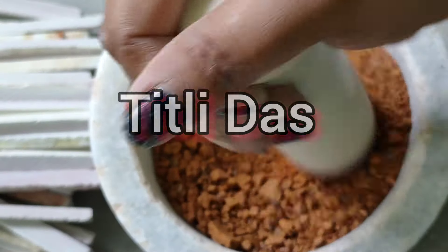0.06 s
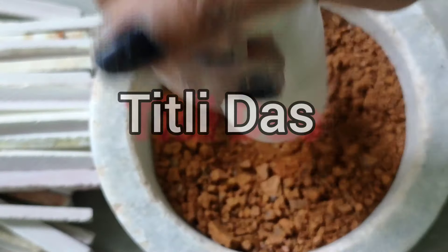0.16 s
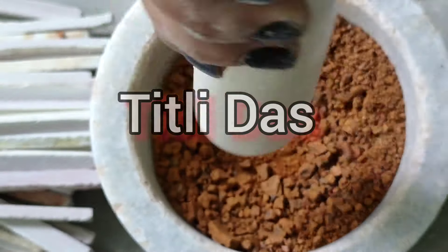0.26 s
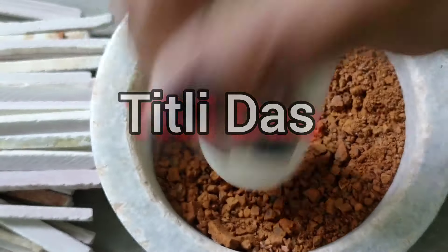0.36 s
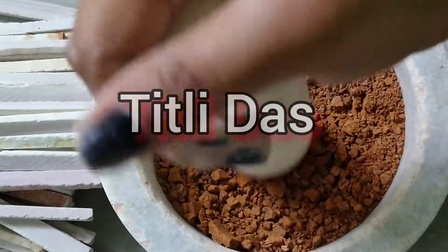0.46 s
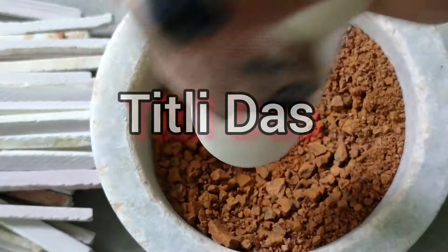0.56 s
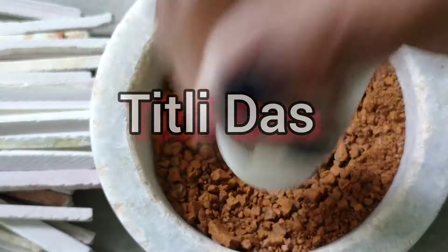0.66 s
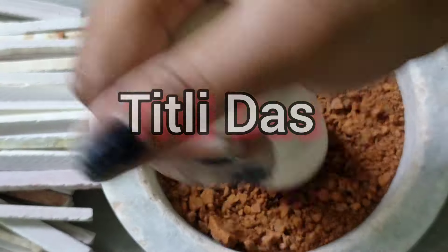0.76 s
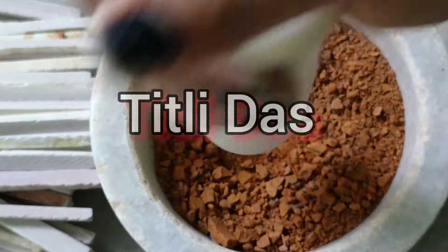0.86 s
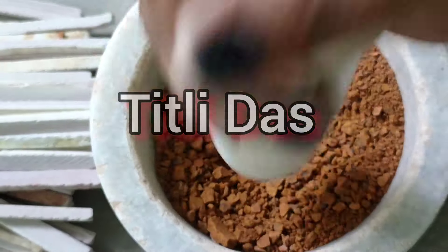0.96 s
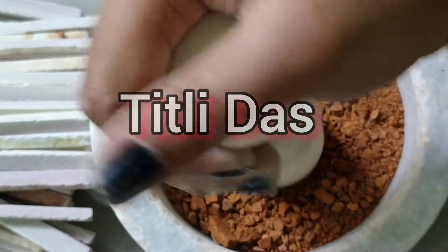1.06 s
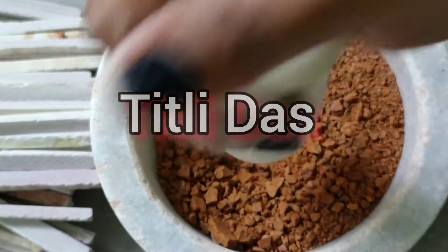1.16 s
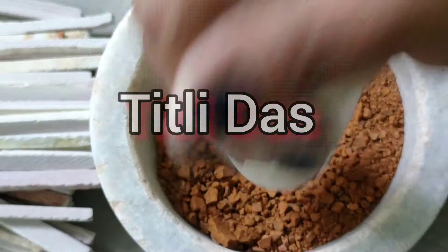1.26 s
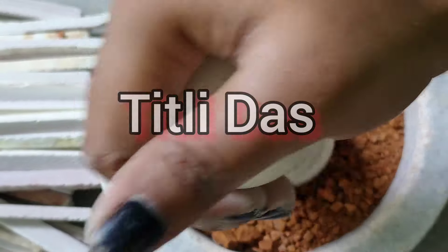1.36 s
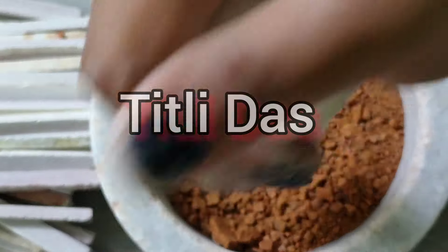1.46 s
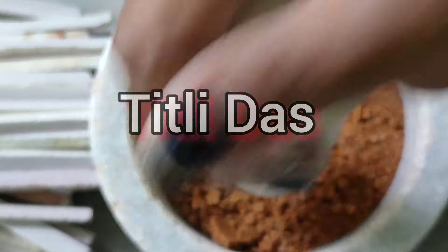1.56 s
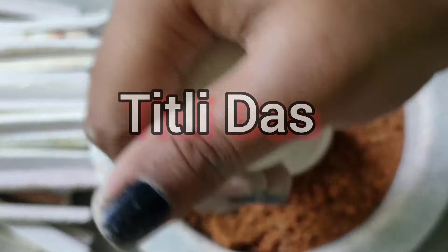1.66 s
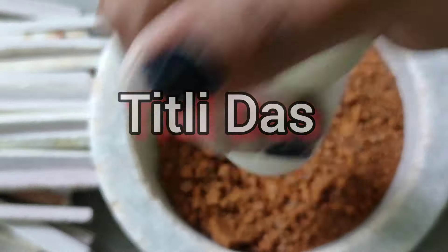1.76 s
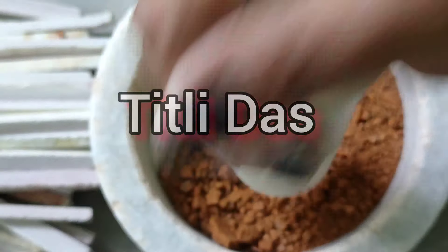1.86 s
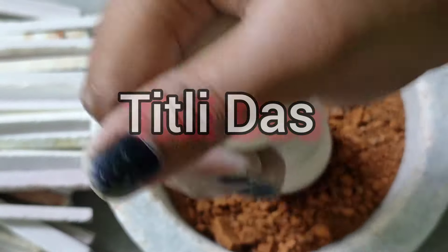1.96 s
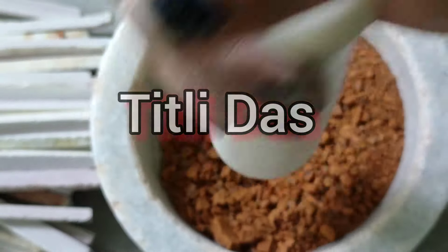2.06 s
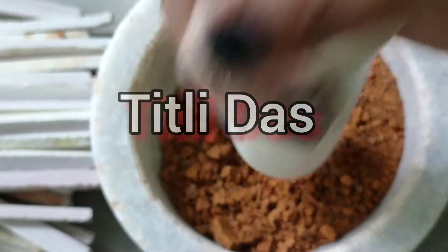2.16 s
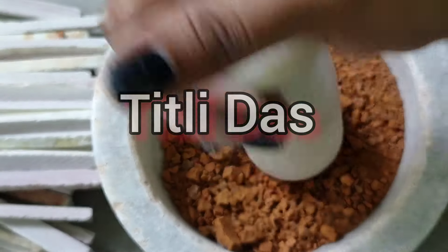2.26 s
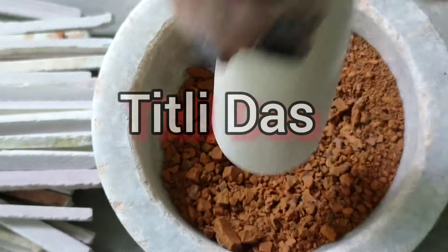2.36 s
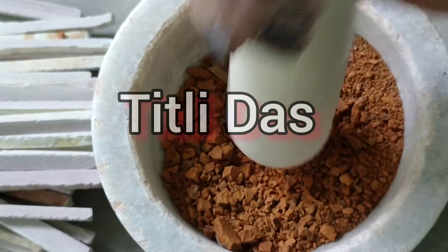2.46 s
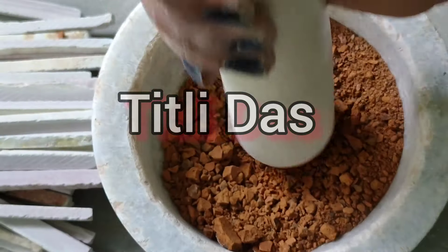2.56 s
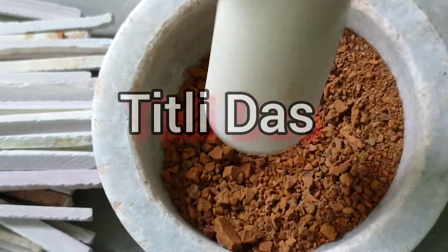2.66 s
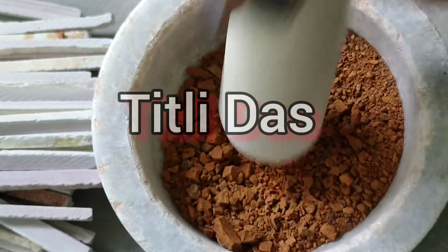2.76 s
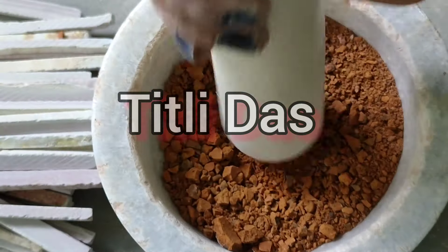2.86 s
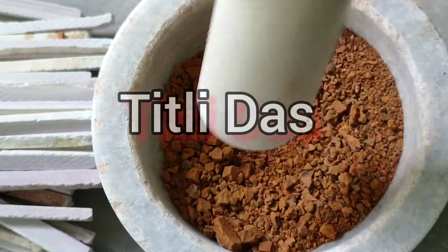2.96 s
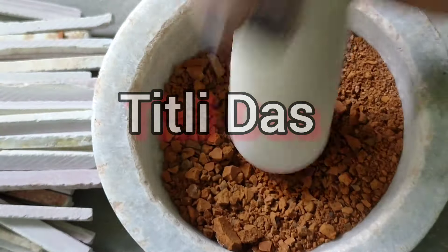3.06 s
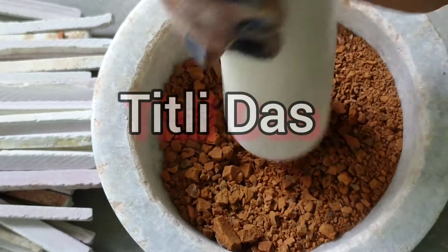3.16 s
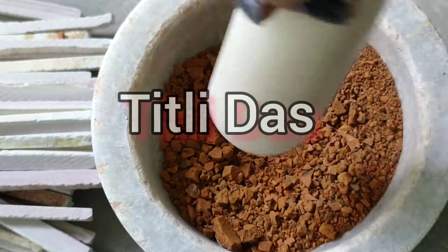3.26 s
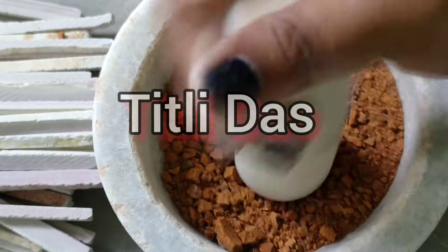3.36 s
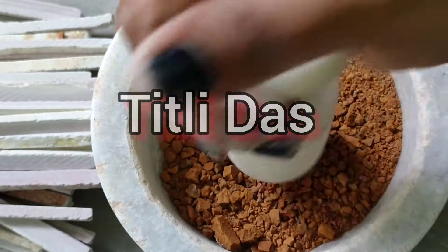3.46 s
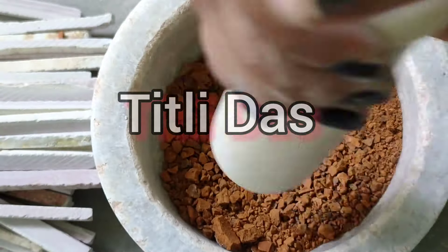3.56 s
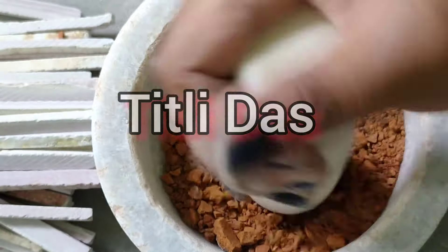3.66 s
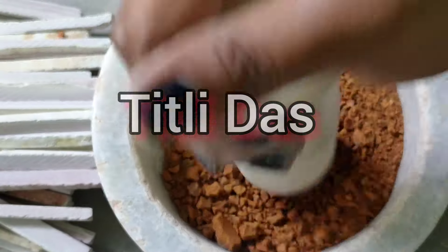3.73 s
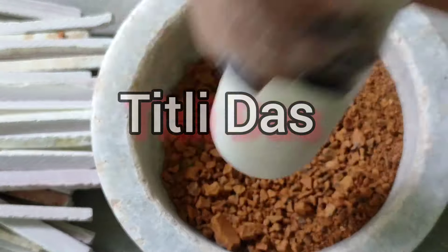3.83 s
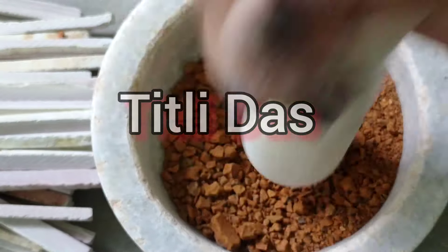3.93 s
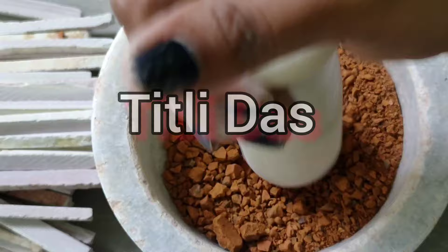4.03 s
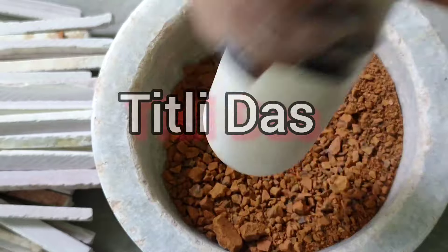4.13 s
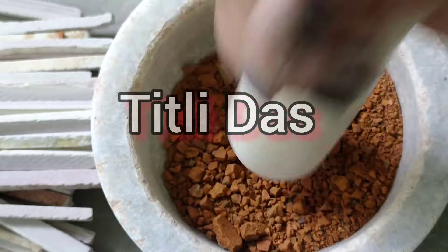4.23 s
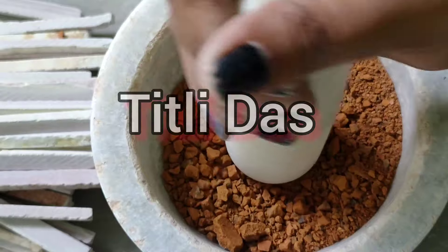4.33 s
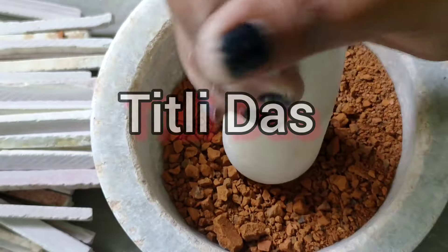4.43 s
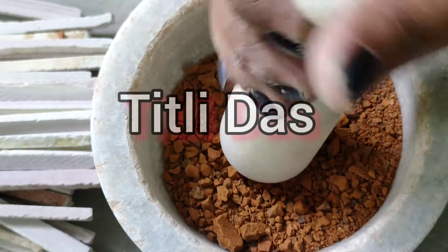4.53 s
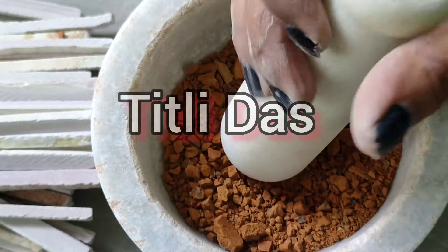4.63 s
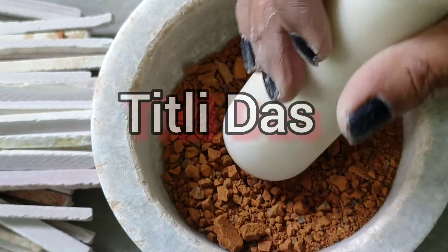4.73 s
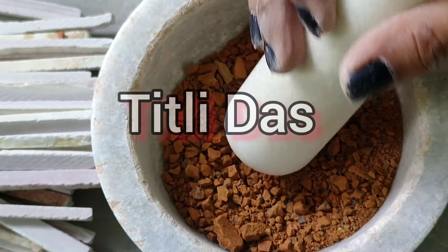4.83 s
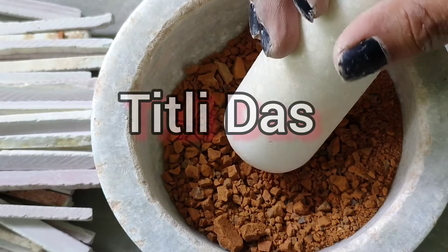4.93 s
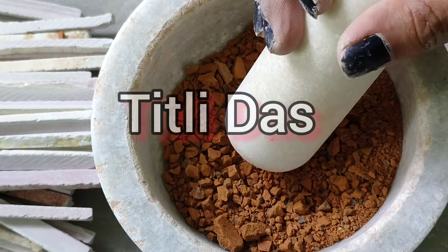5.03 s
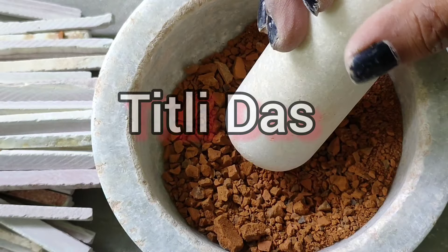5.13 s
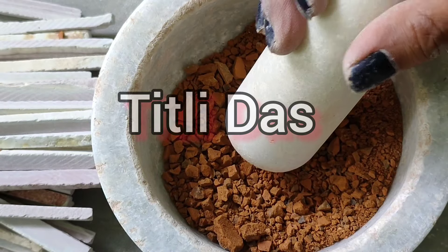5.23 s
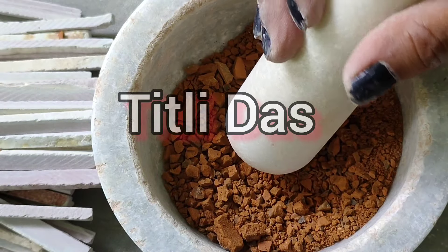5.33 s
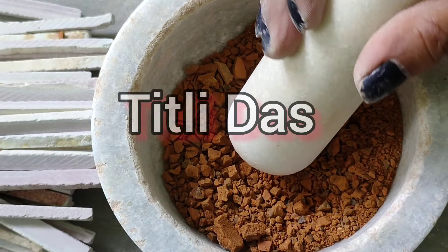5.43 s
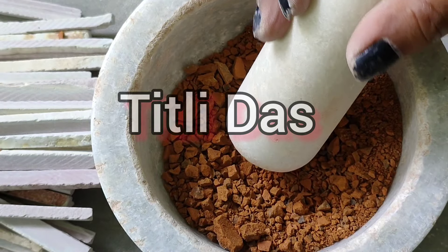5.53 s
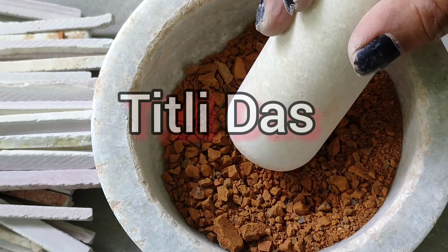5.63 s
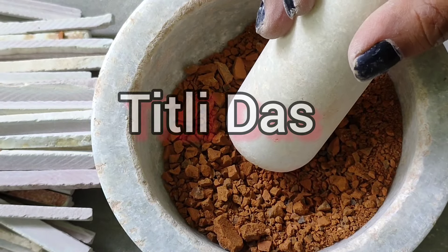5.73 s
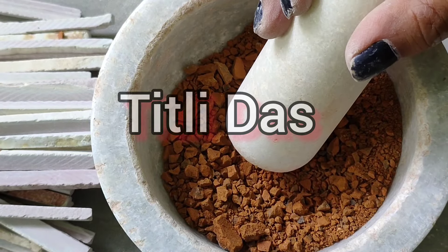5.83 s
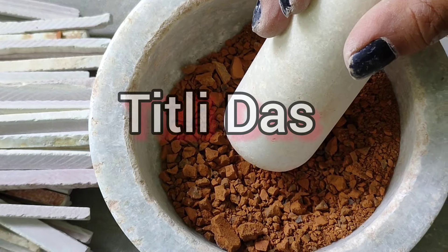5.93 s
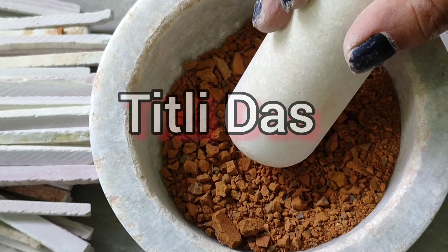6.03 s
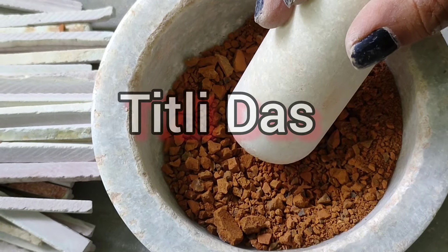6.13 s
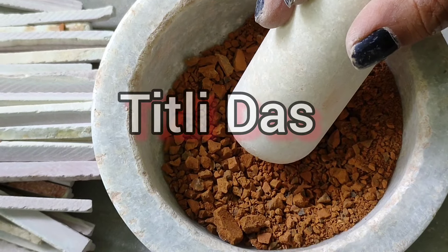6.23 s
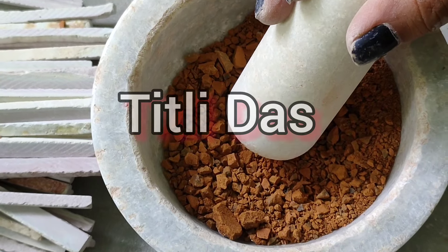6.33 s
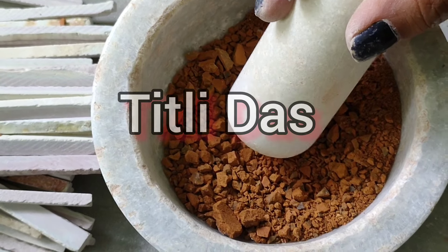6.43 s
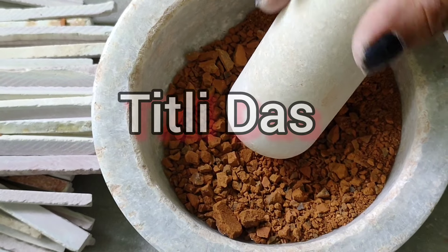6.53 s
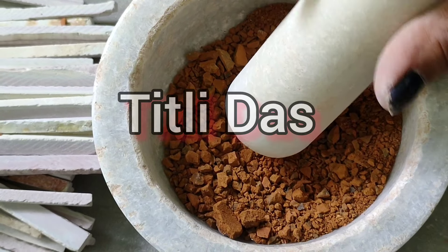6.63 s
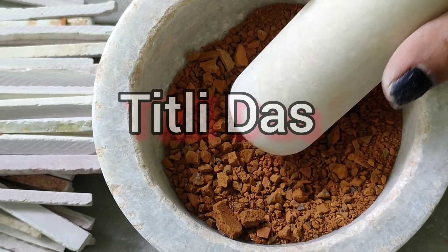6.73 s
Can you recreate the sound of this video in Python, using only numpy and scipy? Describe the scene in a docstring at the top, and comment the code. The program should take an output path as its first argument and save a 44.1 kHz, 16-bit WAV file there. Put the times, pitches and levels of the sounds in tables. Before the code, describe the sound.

Rapid, regular mortar-and-pestle pounding: short woody-sounding stone knocks, doubled by quick rebounds, with crisp snaps of chalk and sprayed grit. The first blows are weaker, later ones fuller. The echoes of a hard, empty room linger briefly. Then near quiet: a few hollow taps, a soft finger slide, tiny crumb ticks and short grainy scrapes near the end, over low handling rumble and still air. Close stereo microphone, held in hand.

```python
"""A stone pestle pounds chalk lumps in a marble mortar: fourteen strokes at an even pace, then rest.
Damped modes make the knocks, shaped noise bursts the cracks, tiny grains the grit, slips and taps the rest.
A bare, hard room rings on as banded noise tails and standing waves.
Fingers hiss on the pestle, with one tiny high tick near the end; the hand that holds the close microphone
rumbles and bumps, and still air lies below.
"""
import sys
import numpy as np
from scipy import signal
from scipy.fft import rfft, irfft
from scipy.io import wavfile
from scipy.ndimage import uniform_filter1d

SR = 44100
rng = np.random.default_rng(int(sys.argv[2]) if len(sys.argv) > 2 else 0)


def materialize(psi):
    """Save the field psi as 16-bit PCM at rate SR to the path in sys.argv[1].

    A 1-D psi becomes a single channel; in a 2-D psi each row is a channel.
    """
    bounded = np.clip(np.atleast_2d(psi).T, -1, 1)
    quanta = np.round(bounded * 32767).astype(np.int16)
    wavfile.write(sys.argv[1], SR, quanta)


N = 299439
TIME = np.arange(N) / SR
TOP_HZ = 15900


# the pestle lands on the chalk; knock levels before the bowl's filters, crack and grit before their colour:
# (t/s, clack level/dB, thud level/dB, clack f/Hz, crack level/dB, crumbling relative to the snap level/dB,
#  bright ring level/dB, grit level/dB, send to the room level/dB)
STROKES = [(0.3346, -14, -24, 1330, -46, -20, -42, -71, -1.5),
           (0.65, -4, -12, 1150, -34, -15.5, -37, -50, -2), (0.9555, -6, -6, 1330, -40, -26, -37, -30, 0.5),
           (1.2484, -11.5, -2.5, 1320, -45.5, -18.5, -43, -32, -1),
           (1.5448, -16.5, -4, 1290, -43, -17.5, -43.5, -40, -0.5),
           (1.8423, -2.5, -4, 1136, -45, -6.5, -56.5, -38.5, 0.5),
           (2.1395, -6, -3.5, 1184, -44.5, -12, -60, -40, -2),
           (2.4319, -5.5, -15.5, 1080, -37.5, -18.5, -46, -51.5, -3),
           (2.7283, -1, -6.5, 1290, -42, -15, -47.5, -38, -1.5),
           (3.0184, 1.5, -7, 1360, -44.5, -18.5, -41, -36, 1),
           (3.3045, -0.5, -5.5, 1350, -48, -11, -73.5, -54, -2),
           (3.5923, -11, -7.5, 1250, -37.5, -8.5, -48, -35, -2),
           (3.8974, -4, -10, 1220, -44.5, -19.5, -41, -45, -2.5),
           (4.1955, -0.5, -7, 1365, -40.5, -18, -45, -35.5, 2)]
# the pestle bounces or a lump gives way, and it drops onto the stone again; levels as for the strokes:
# (t/s, clack level/dB, thud level/dB, clack f/Hz, crack level/dB, grit level/dB)
DROPS = [(0.3375, -16.5, -27.5, 1460, -49, -55.5), (0.3402, -27, -31, 1750, -55.5, -60.5),
         (0.3673, -27, -30.5, 1450, -65, -67), (0.6525, -6, -19, 1100, -54, -53.5),
         (0.656, -20.5, -25, 1140, -61, -54), (0.684, -10.5, -13, 1160, -61, -52),
         (0.7051, -7.5, -14.5, 1220, -54, -47.5), (0.957, -15.5, -25, 1360, -66, -38),
         (0.9637, -14.5, -22, 1300, -59.5, -53), (0.9727, -23.5, -15.5, 1260, -57, -49.5),
         (0.9825, -7.5, -16, 1270, -57.5, -47), (0.9971, -14, -24.5, 1290, -62.5, -49),
         (1.2513, -1.5, -10, 1280, -45, -47), (1.2547, -3, -23, 1160, -55.5, -52.5),
         (1.267, -17.5, -20, 1250, -64, -52.5), (1.2792, -8, -15, 1210, -62.5, -51.5),
         (1.295, -13.5, -19.5, 1300, -66.5, -46.5), (1.549, -6, -18.5, 1163, -54.5, -39.5),
         (1.552, -15, -14, 1240, -67, -44.5), (1.563, -11, -11.5, 1310, -55.5, -46.5),
         (1.8449, -20, -19, 1250, -58.5, -47), (1.8639, -6, -20.5, 1270, -62, -46.5),
         (1.8749, -4.5, -21.5, 1160, -73.5, -46), (2.142, -9.5, -17.5, 1310, -55.5, -44),
         (2.1554, -19, -27.5, 1280, -65, -48.5), (2.169, -3, -19, 1250, -60, -37),
         (2.178, -11, -15.5, 1272, -62, -40), (2.4389, 0, -11.5, 1296, -45.5, -46.5),
         (2.4425, -6, -15, 1370, -56, -40.5), (2.4859, -16.5, -30.5, 1330, -66.5, -57.5),
         (2.7332, -9, -18.5, 1300, -61.5, -49.5), (2.7359, 1.5, -15, 1334, -60.5, -48),
         (3.0264, -8, -19.5, 1330, -60.5, -39), (3.0291, -4.5, -25, 1340, -57, -44),
         (3.3262, -14.5, -21, 1320, -63, -62.5), (3.3373, -7, -9.5, 1280, -65.5, -62),
         (3.3522, -9, -13, 1240, -61, -58.5), (3.5946, -1.5, -22, 1220, -56, -40.5),
         (3.6249, -19.5, -26.5, 1250, -65, -44), (3.6348, -2.5, -12.5, 1215, -54, -38.5),
         (3.666, -4, -14.5, 1270, -60, -30), (3.671, -13, -20, 1244, -62, -47),
         (3.899, -16, -32.5, 1260, -57.5, -51.5), (3.934, -2, -14, 1284, -45.5, -29),
         (3.942, -12, -34, 1330, -60.5, -35.5), (4.2035, -5.5, -19.5, 1305, -65.5, -53),
         (4.213, -11.5, -16.5, 1300, -61, -42.5)]


def contacts(count=3, from_s=0.0087, to_s=0.045, rattle_db=-19, rattle_db_per_s=-1.5):
    """Every meeting of pestle and bowl: landings, drops, and a light rattle through ever finer crumbs."""
    meetings = [row[:4] for row in DROPS]
    for s, clack_db, thud_db, hz, *_ in STROKES:
        meetings.append((s, clack_db, thud_db, hz))
        fall_db = rattle_db + rattle_db_per_s * s
        # one rattle at a random moment in each equal part of the window
        places = (np.arange(count) + rng.random(count)) / count
        for delay in from_s + (to_s - from_s) * places:
            meetings.append((s + delay, clack_db + fall_db, thud_db + fall_db, hz))
    return meetings


# modes of the damped bowl that follow the point of contact, levels relative and before the tilt:
# (f as a ratio to the clack pitch, swell/ms, level/dB)
CLACK_MODES = [(.8, 0.72, 2), (0.997, 0.66, 20), (1.25, 0.6, -4), (1.83, 0.6, -4.5), (2.148, 0.52, -10.5)]
# the deeper body of the mortar, levels relative: (f/Hz, swell/ms, level/dB)
THUD_MODES = [(217.9, 2, -4.5), (338.8, 1.54, 1.5), (517, 1.067, 9.5), (667, 0.74, -25)]


def knocks(thud_lead_s=0.00053, even_db=12.5, gap_hz=850, gap_width_hz=260, gap_depth=0.41,
           lowest_hz=130, cushion_hz=3600):
    """Every contact rings the bowl for a few milliseconds; chalk and hand damp it at once."""
    track, t = np.zeros(N), np.arange(SR // 30) / SR
    thud = sum(undb(db) * ring(t, hz, ms) for hz, ms, db in THUD_MODES)
    thud /= np.abs(thud).max()
    for s, clack_db, thud_db, pitch in contacts():
        # little chalk in between, a short contact: more clack than thud, and stronger upper modes
        tilt_db = np.clip(clack_db - thud_db - even_db, -10, 10)  # per octave
        clack = sum(undb(db + tilt_db * np.log2(ratio)) * ring(t, ratio * pitch, ms)
                    for ratio, ms, db in CLACK_MODES)
        add(track, s, undb(clack_db) * clack / np.abs(clack).max())
        # the bowl is already pushed while the last chalk gives way
        add(track, s - thud_lead_s, undb(thud_db) * thud)
    # between its thud and its clack the bowl answers less
    track = track - gap_depth * resonant(track, gap_hz, gap_width_hz)
    # powder cushions the contact, and a small bowl radiates little bass
    band = signal.butter(2, [lowest_hz, cushion_hz], "band", fs=SR, output="sos")
    return signal.sosfiltfilt(band, track)


# colour of breaking chalk, relative: (f/Hz, level/dB)
CRACK_COLOUR = [(500, 2.5), (1500, 21), (2600, 3), (3400, -3), (4100, -1.5), (4700, 0), (5400, 2.5),
                (6300, 2.5), (7000, 0), (8200, 2.5), (8900, -8.5), (12500, -8.5), (14500, -4.5),
                (16000, -11)]
# the chalk snaps just before the stone is struck
SNAP_LEAD_S, SNAP_SWELL_S = 0.001, 0.00046
# after a drop: crumbling relative to the snap, and a fainter ring relative to the crack
DROP_CRUMBLE_DB, DROP_RING_DB = -20, -10
# the bright ring of the stone, its random scatter, and a broad mode just under it
RING_HZ, RING_SCATTER_HZ, RING_SWELL_MS = 8040, 60, 0.93
SKIRT_RATIO, SKIRT_SWELL_MS, SKIRT_DB = .945, .35, -2


def crunches(crumble_s=0.0031, fade_in_s=0.0018, spread_db=4.0, uneven_db=2.5):
    """A noise burst with a short fade-in before its snap, a crumbling tail, and a bright ring of the stone."""
    cracks, bright = np.zeros(N), np.zeros(N)
    t = np.arange(-SR // 150, SR // 12) / SR
    u = np.maximum(t, 0) / SNAP_SWELL_S
    snap = u * np.exp(1 - u)
    fade_and_tail = np.exp(np.minimum(t / fade_in_s, -t / crumble_s))
    bands = np.linspace(2500, TOP_HZ, 44)
    breaks = [(s, crack_db, crumble_db, ring_db)
              for s, _, _, _, crack_db, crumble_db, ring_db, _, _ in STROKES]
    breaks += [(s, crack_db, DROP_CRUMBLE_DB, crack_db + DROP_RING_DB) for s, *_, crack_db, _ in DROPS]
    for s, crack_db, crumble_db, ring_db in breaks:
        boost_db = spread_db * np.minimum(rng.exponential(size=len(t)), 4)
        sizes = rng.standard_normal(len(t)) * undb(boost_db)
        burst = sizes * (snap + undb(crumble_db) * fade_and_tail)
        # random uneven bands filter the treble of each burst; below the first band it stays even
        bands_db = uneven_db * rng.standard_normal(len(bands)) * (bands > bands[0])
        burst = unit(coloured(burst, np.transpose([bands, bands_db])))
        add(cracks, s - SNAP_LEAD_S + t[0], burst * undb(crack_db))
        # the pitch varies with the point of contact
        hz = RING_HZ + RING_SCATTER_HZ * rng.standard_normal()
        modes = ring(t, hz, RING_SWELL_MS) + undb(SKIRT_DB) * ring(t, SKIRT_RATIO * hz, SKIRT_SWELL_MS)
        add(bright, s + t[0], unit(modes) * undb(ring_db))
    return coloured(cracks, CRACK_COLOUR), bright


# colour of the snapping crumbs, relative: (f/Hz, level/dB)
GRIT_COLOUR = [(60, -35), (500, -10.5), (1000, 5.5), (1800, -3.5), (2300, -0.5), (2850, -14.5),
               (3400, -22.5), (4000, -25), (4700, -27.5), (6000, -26), (10000, -34.5), (15000, -34)]


def grit(settle_s=0.032, burst_s=0.004, grain_ms=0.26, spread_db=5.0, low_hz=700, high_hz=4200, count=28):
    """Crumbs snap, each with its own size and pitch: a spray as the pestle sinks in, a burst at every drop."""
    track, t = np.zeros(N), TIME[:SR // 100]
    sprays = [(s, grit_db, settle_s) for s, *_, grit_db, _ in STROKES]
    sprays += [(s, grit_db, burst_s) for s, *_, grit_db in DROPS]
    for s, grit_db, length_s in sprays:
        spray = np.zeros(SR // 4)
        for wait, size, pitch in rng.random((count, 3)):
            age = 2 * wait ** 2  # crowded towards the landing
            grain = ring(t, low_hz + (high_hz - low_hz) * pitch, grain_ms)
            grain[0] += 1  # a one-sample tick
            add(spray, age * length_s, grain * np.exp(-age) * undb(-spread_db * np.log(1 - size)))
        add(track, s, unit(spray) * undb(grit_db))
    return coloured(track, GRIT_COLOUR)


# faint hollow taps as the pestle shifts and settles: (t/s, peak level/dB, f/Hz)
SHIFTS = [(.02, -42.5, 634), (.16, -52, 1330), (4.494, -34.5, 555), (4.55, -36.5, 596), (4.64, -48, 568),
          (4.743, -45.5, 522), (4.856, -53, 956), (4.862, -53.5, 726), (5.128, -57, 1310),
          (5.291, -50.5, 1030), (5.444, -52, 499), (5.48, -61, 1140), (5.58, -55, 950), (5.644, -53, 490),
          (5.812, -49, 713), (5.83, -57, 959), (5.883, -54.5, 500), (5.99, -58, 697), (6.181, -43.5, 520),
          (6.198, -51, 548), (6.213, -47, 525), (6.445, -47.5, 654), (6.457, -48, 340), (6.605, -55, 930),
          (6.67, -47, 469)]


def shifts(swell_ms=3.5, crumb_db=-61, crumb_scatter_db=3, crumb_ms=0.66, low_hz=600, high_hz=2400, count=60):
    """The pestle tips against the bowl in soft modes; loose crumbs tick at random moments throughout."""
    track, t = np.zeros(N), TIME[:SR // 10]
    for s, db, hz in SHIFTS:
        add(track, s, undb(db) * ring(t, hz, swell_ms))
    for when, pitch, size in rng.random((count, 3)):
        hz = low_hz * (high_hz / low_hz) ** pitch
        crumb_level_db = crumb_db + crumb_scatter_db * (2 * size - 1)
        add(track, when * TIME[-1], undb(crumb_level_db) * ring(t, hz, crumb_ms))
    return track


# the leaning pestle creeps over the crumbs, level of the hollow tone at the top:
# (t/s at the top, level/dB, half length/s, hollow f/Hz)
SCRAPES = [(4.869, -75, 0.042, 559), (5.839, -71, 0.056, 1000), (5.952, -70, 0.026, 1000),
           (6.24, -70.5, 0.036, 905), (6.535, -61.5, 0.041, 450), (6.605, -57, .02, 470),
           (6.717, -58.5, 0.053, 524)]


def scrapes(per_s=260, spread_db=2, hollow_width_hz=160, grain_hz=1050, grain_width_hz=450, grain_db=-12):
    """The pestle sticks and slips on loose grains; each slip ticks and stirs the hollow of the bowl."""
    track = np.zeros(N)
    for s, db, half_s, hz in SCRAPES:
        happens = rng.random(N) < per_s / SR
        slips = happens * rng.standard_normal(N) * undb(spread_db * rng.standard_normal(N))
        hollow = resonant(resonant(slips, hz, hollow_width_hz), hz, hollow_width_hz)
        ticks = resonant(resonant(slips, grain_hz, grain_width_hz), grain_hz, grain_width_hz)
        swell = np.exp(-((TIME - s) / half_s) ** 2)
        track += (unit(hollow) + undb(grain_db) * unit(ticks)) * undb(db) * swell
    return track


# hisses of fingers on the pestle, and in the last row one tiny high tick:
# (t/s at the top, level/dB, rise/s, fall/s, left minus right level/dB)
SLIDES = [(4.617, -53, 0.056, 0.069, 0), (5.095, -60.5, 0.026, 0.04, 15), (6.458, -67, 0.0055, 0.0097, -7)]
# colour of the hiss, relative: (f/Hz, level/dB)
SLIDE_COLOUR = [(2500, -11), (4600, -17.5), (6200, 7), (8000, -1), (12000, -4), (15000, 2), (16000, -12)]


def slides(rough_db=2):
    """Fingers hiss on the pestle as uneven noise that swells and fades; one tiny high tick comes near the end."""
    catch = undb(rough_db * unit(uniform_filter1d(rng.standard_normal(N), size=200)))
    hiss = unit(coloured(pair(N, 0.16), SLIDE_COLOUR) * catch)
    track = np.zeros((2, N))
    for s, db, rise_s, fall_s, side_db in SLIDES:
        swell = np.exp(-((TIME - s) / np.where(TIME < s, rise_s, fall_s)) ** 2)
        track += hiss * undb(db) * swell * panned(side_db)
    return track


# colour of the grip's rumble, relative: (f/Hz, level/dB)
GRIP_COLOUR = [(12, -39.5), (20, -22.5), (64, 2), (118, 3.5), (222, -11.5), (255, -25), (386, -38),
               (492, -27), (600, -46.5), (780, -57.5), (1320, -120)]
# the grip through pounding and rest, before trim, waver and jolts: (t/s, level/dB)
GRIP_LEVEL = [(0, -34), (.24, -54.5), (.4, -37), (.55, -53.5), (1.1, -41.5), (2.1, -36), (3.6, -35.5),
              (4.4, -38.5), (4.72, -40), (5, -37), (5.3, -42), (5.39, -49.5), (5.54, -37), (5.82, -39),
              (5.93, -50.5), (6.12, -38), (6.24, -31.5), (6.34, -38.5), (6.42, -30.5), (6.54, -38),
              (6.62, -32.5), (6.79, -49)]
# the side on which the grip presses: (t/s, left minus right level/dB)
GRIP_SIDE = [(0.0, 18), (0.13, 23), (0.28, -1), (3.23, -5), (3.46, 16), (3.5, -9.5), (4.71, -1.5),
             (4.97, -15.5), (5.05, 9), (5.39, 4), (5.52, -25), (6.2, -25.5), (6.49, 10), (6.79, 8)]
# soft bumps of the hand, levels before case ring, dulling and panning:
# (t/s, level/dB, f/Hz, swell/ms, left minus right level/dB)
BUMPS = [(.005, -27, 135, 4.5, 35), (0.387, -24, 115.6, 16.5, -17), (2.158, -25, 87, 7.8, -27),
         (2.7, -14.5, 100, 8.4, -16), (2.905, -21.5, 81.5, 9.3, -31), (3.405, -18.5, 88, 5.8, 30),
         (4.1, -19, 106, 4.2, -20), (4.831, -31, 73, 7.2, -6), (5.555, -32.5, 126, 6.3, -30),
         (5.738, -22.5, 105.5, 4.1, -40), (5.82, -30.5, 140.4, 4.6, -27), (6.061, -32.5, 109.7, 5, -28),
         (6.114, -34, 141.7, 4.1, -26), (6.244, -21, 126, 7.2, -36), (6.454, -17.5, 159.4, 3.9, 17),
         (6.592, -19, 123.6, 4.6, 28)]


def handling(trim_db=-1, alike=0.47, waver_db=2, jolt_db=2.5, jolt_s=0.05,
             case_hz=245, case_ms=5, case_db=-11, dull_hz=330):
    """The grip rumbles unevenly through the microphone's case, swelling after strokes, with dull bumps."""
    stroke_s = np.transpose(STROKES)[0][:, None]
    ages = np.maximum(TIME - stroke_s, 0) / jolt_s
    jolts = np.sum(ages * np.exp(1 - ages), axis=0)
    waver = unit(uniform_filter1d(uniform_filter1d(rng.standard_normal(N), size=2600), size=900))
    level_db = np.interp(TIME, *np.transpose(GRIP_LEVEL)) + trim_db + waver_db * waver + jolt_db * jolts
    rumble = coloured(pair(N, alike), GRIP_COLOUR)
    # even out the noise before the level curve shapes it
    rumble /= np.sqrt(uniform_filter1d(rumble ** 2, size=SR // 8, axis=1))
    track = rumble * undb(level_db) * panned(np.interp(TIME, *np.transpose(GRIP_SIDE)))
    t = TIME[:SR // 5]
    dull = signal.butter(4, dull_hz, fs=SR, output="sos")
    for s, db, hz, ms, side_db in BUMPS:
        bump = ring(t, hz, ms) + undb(case_db) * ring(t, case_hz, case_ms)
        add(track, s, undb(db) * signal.sosfiltfilt(dull, bump) * panned(side_db))
    return track


# first reflections beside each microphone port, left port then right: (delay/ms, level/dB)
REFLECTIONS = [
    [(.72, -9.5), (2.1, -14)],
    [(2.5, -11.5), (0.45, -40)],
]


def ports(x, left_lag_ms=0.046):
    """Each port hears the bowl directly and off its own nearby surfaces; the left one is further away."""
    khz = np.fft.rfftfreq(N, 1000 / SR)
    paths = np.array([1 + sum(undb(db) * np.exp(-2j * np.pi * khz * ms) for ms, db in port)
                      for port in REFLECTIONS])
    paths[0] *= np.exp(-2j * np.pi * khz * left_lag_ms)
    return irfft(rfft(x) * paths, N)


# the room's bands, levels relative, decay before the late drop:
# (f/Hz, level/dB, time to fall by 60 dB/s, likeness of left and right 0-1)
ROOM = [(98, -10.5, 0.9, 0.9), (190, 10, 1, 1), (306, 4.5, 0.53, 0.7), (560, 1, 0.94, 0.5),
        (778.7, 5.5, 0.68, 0.6), (850, 2, 0.52, .3), (1010, -1, 0.65, 0.5), (1146, -6, 0.74, 0),
        (2205, 1, 0.42, 0), (2940, -0.5, 0.33, 0), (3918, -13.5, 0.37, 0.7), (6354, -4, 0.29, 0.1),
        (7986, -8, 0.528, 0.2), (9400, -10.5, 0.23, .05), (14870, -6.5, 0.4, 0.2)]


def reflections(t, build_s=0.0061, late_s=0.39):
    """Dense reflections, as shaped noise, build up and fade band by band."""
    bins_hz = np.arange(SR // 2 + 1)  # one second of response: bins 1 Hz apart
    hz, db, t60, alike = np.transpose(ROOM)
    mid, side = diffuse(t)
    alike = np.clip(on_log(bins_hz, hz, alike), 0, 1)
    noise = np.sqrt((1 + alike) / 2) * mid + np.sqrt((1 - alike) / 2) * np.array([side, -side])
    # the echoes need a moment to thicken, and the late tail drops away faster
    swell = (1 - np.exp(-(t / build_s) ** 2)) * np.exp(-(t / late_s) ** 4)
    response = np.zeros((2, SR))
    for share, level_db, decay_s in zip(np.eye(len(hz)), db, t60):
        fade = swell * np.exp(-np.log(1000) * t / decay_s)
        band = irfft(noise * on_log(bins_hz, hz, share), SR)
        response += band * fade * undb(level_db) / np.sqrt(np.sum(fade ** 2))
    return response


def diffuse(t, smooth_bins=21):
    """Spectra of two rows of random reflections whose early part is evened out to favour no pitch."""
    noise = rng.standard_normal((2, len(t)))
    early = np.abs(rfft(noise * np.exp(-10 * t))) ** 2
    return rfft(noise) * np.sqrt(early.mean() / uniform_filter1d(early, smooth_bins, axis=1))


# standing waves between the walls, levels before trim: (f/Hz, level/dB, time to fall by 60 dB/s)
ROOM_MODES = [(171, -43, 1.3), (265, -46.5, .7), (311, -50.5, .6), (375, -51, .6), (536, -55, .7),
              (603, -58, .6), (674, -55, .6), (748, -56, .6), (1061, -56, .5), (1286, -57, .4),
              (1353, -59, .45), (1450, -58, .6), (1770, -55, .45), (2137, -56, .4)]


def room(x, trim_db=-6, turns_per_s=.6):
    """Sound fades steadily to and fro between two random patterns of reflections; standing waves hum below."""
    t, turn = TIME[:SR], 2 * np.pi * turns_per_s * TIME
    waves = sum(undb(db + trim_db) * np.exp(-np.log(1000) * t / t60) * np.sin(2 * np.pi * hz * t)
                for hz, db, t60 in ROOM_MODES)
    echoes = sum(signal.fftconvolve((x * share)[None], reflections(t), axes=1)
                 for share in (np.cos(turn), np.sin(turn)))
    return (echoes + signal.fftconvolve(x, waves))[:, :N]


# colour of the still room, relative: (f/Hz, level/dB)
AIR_COLOUR = [(120, -3.5), (250, -10), (380, -4.5), (520, -10), (750, -8), (1100, -10.5), (1600, -13.5),
              (2500, -20.5), (3200, -26.5), (4200, -37), (6000, -31.5), (8000, -44.5), (10000, -49.5),
              (16000, -55.5)]


def still_air(level_db=-60.5):
    """Steady coloured noise, nearly independent left and right, lies under everything."""
    return unit(coloured(pair(N, 0.092), AIR_COLOUR)) * undb(level_db)


def ring(t, hz, ms):
    """A cushioned mode: its envelope swells to 1 in the given ms, then dies away."""
    u = np.maximum(t, 0) * 1000 / ms
    return u * np.exp(1 - u) * np.sin(2 * np.pi * hz * t)


def resonant(x, hz, width_hz):
    """The part of a sound that one resonance passes."""
    return signal.lfilter(*signal.iirpeak(hz, hz / width_hz, fs=SR), x)


def pair(n, alike):
    """Two channels of noise with a given correlation."""
    mid, side = rng.standard_normal((2, n))
    return (np.sqrt(1 + alike) * mid + np.sqrt(1 - alike) * np.array([side, -side])) / np.sqrt(2)


def coloured(x, colour):
    """Filter by a (f/Hz, level/dB) spectrum."""
    n = x.shape[-1]
    gains = undb(on_log(np.fft.rfftfreq(n, 1 / SR), *np.transpose(colour)))
    return irfft(rfft(x) * gains, n)


def on_log(hz, points, values):
    """Read a spectrum along a log-frequency axis."""
    return np.interp(np.log(np.maximum(hz, 1)), np.log(points), values)


def undb(db):
    """Decibels to gain."""
    return 10 ** (np.asarray(db) / 20)


def unit(x):
    """Scale to rms 1."""
    return x / np.sqrt(np.mean(x ** 2))


def panned(db):
    """Left and right gains of constant power for a level difference."""
    gains = undb(np.array([db, -db]).reshape(2, -1) / 2)
    return gains / np.sqrt(np.mean(gains ** 2, axis=0))


def add(track, s, sound):
    """Mix a sound into a track at a time in seconds."""
    i = max(int(round(s * SR)), 0)
    track[..., i:i + sound.shape[-1]] += sound[..., :N - i]


def scene(crack_pan_db=4, ring_pan_db=-8, ring_direct_db=-3, taps_room_db=-5):
    """The mortar close by, its room, the hands and the still air."""
    stone, taps = knocks() + grit(), shifts() + scrapes()
    cracks, bright = crunches()
    direct = ports(stone + taps + cracks * panned(crack_pan_db)
                   + bright * undb(ring_direct_db) * panned(ring_pan_db))
    # the share sent to the room varies, gliding from stroke to stroke
    s, *_, send_db = np.transpose(STROKES)
    to_room = stone * undb(np.interp(TIME, s, send_db)) + taps * undb(taps_room_db) + cracks + bright
    return direct + room(to_room) + handling() + slides() + still_air()


def record(dry):
    """Whatever exceeds full scale clips; then the top is cut."""
    top_cut = signal.ellip(8, .1, 50, TOP_HZ, fs=SR, output="sos")
    return signal.sosfiltfilt(top_cut, np.clip(dry, -1, 1))


dry = scene()
out = record(dry)
materialize(out)
```